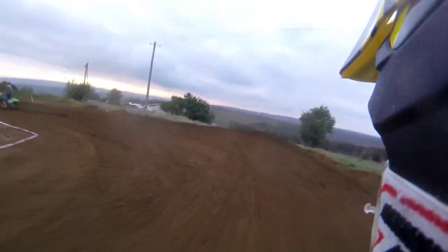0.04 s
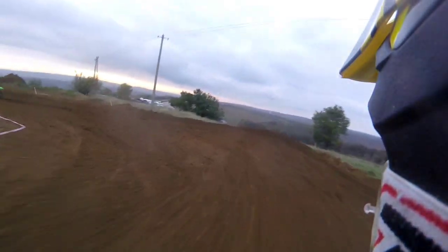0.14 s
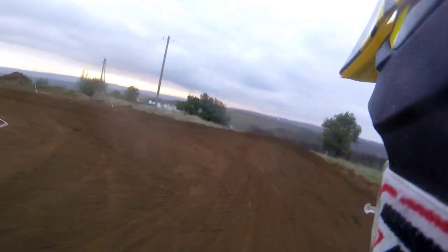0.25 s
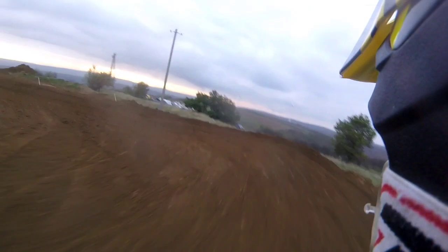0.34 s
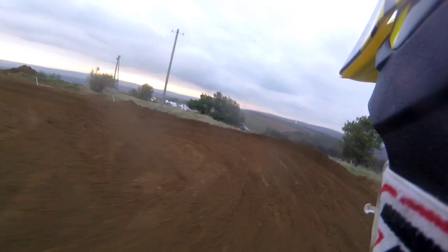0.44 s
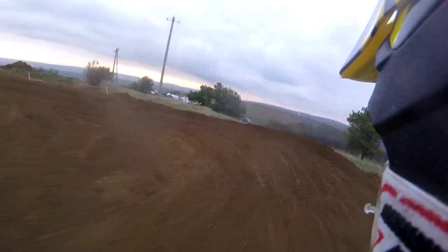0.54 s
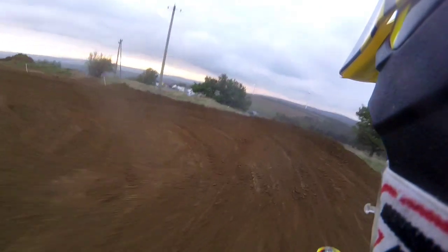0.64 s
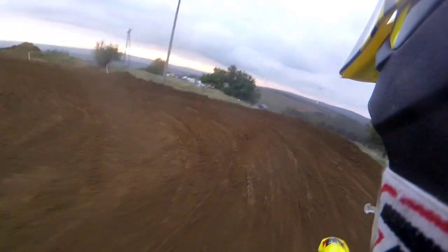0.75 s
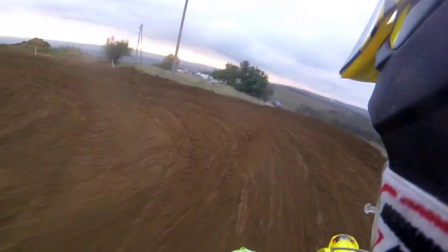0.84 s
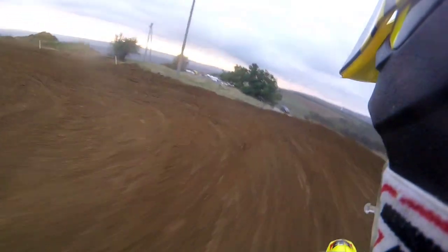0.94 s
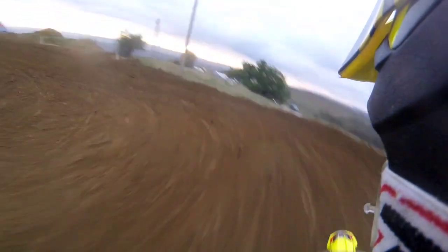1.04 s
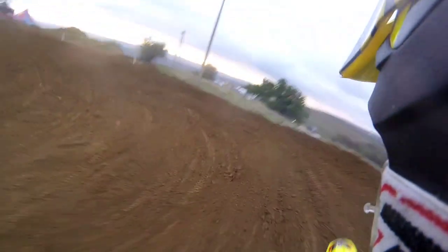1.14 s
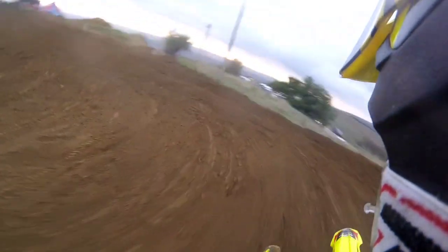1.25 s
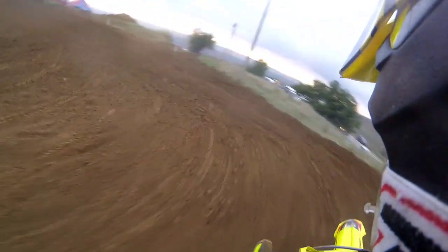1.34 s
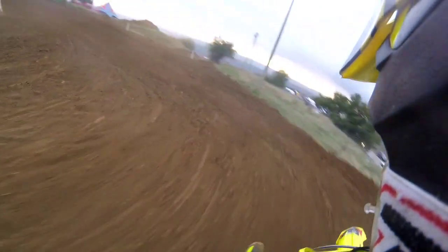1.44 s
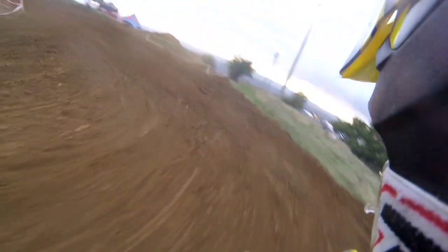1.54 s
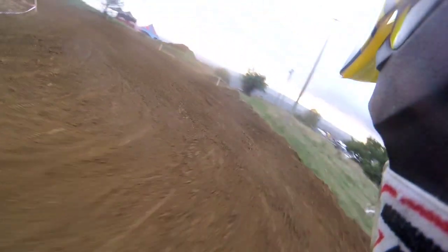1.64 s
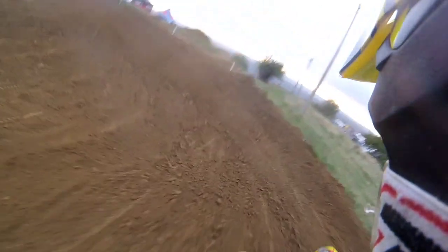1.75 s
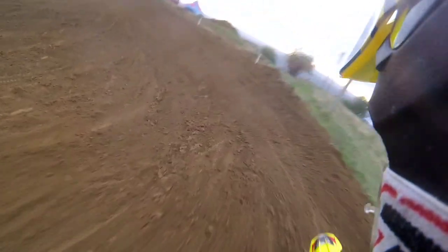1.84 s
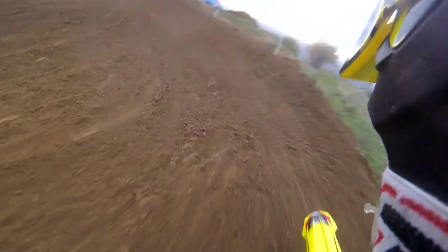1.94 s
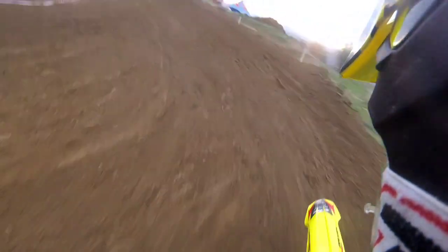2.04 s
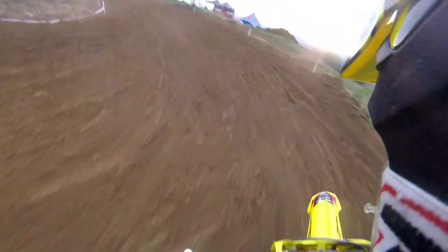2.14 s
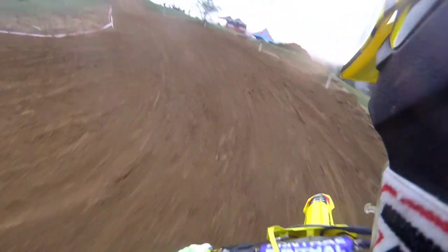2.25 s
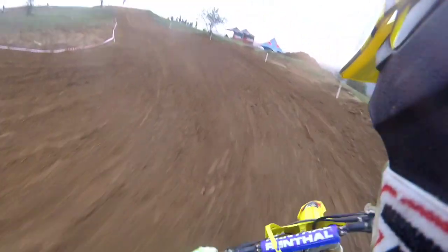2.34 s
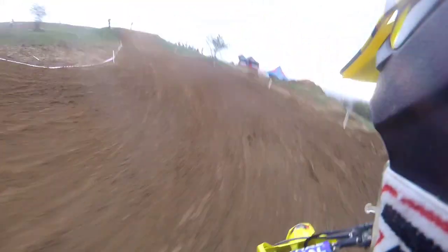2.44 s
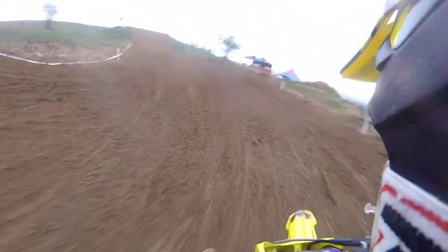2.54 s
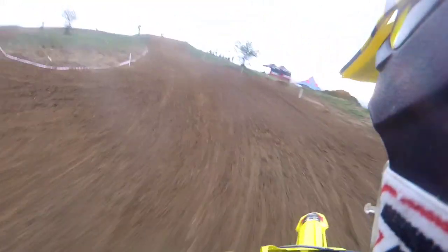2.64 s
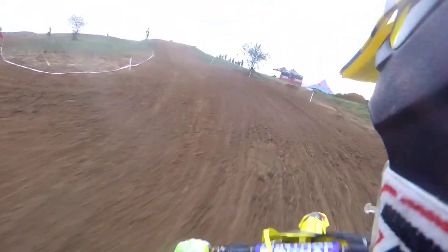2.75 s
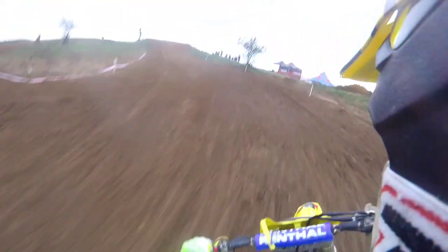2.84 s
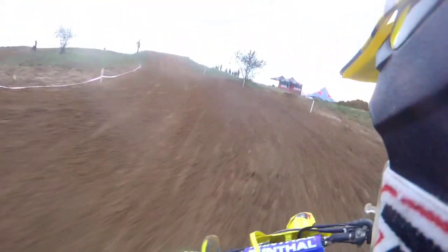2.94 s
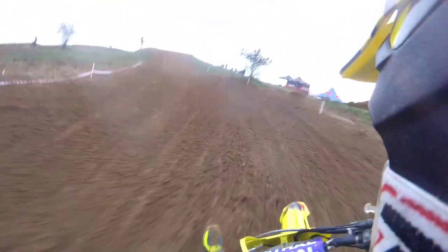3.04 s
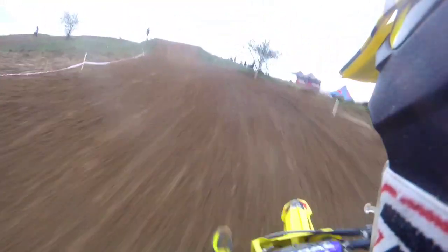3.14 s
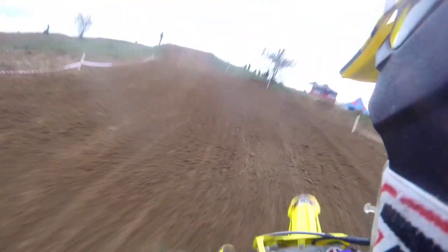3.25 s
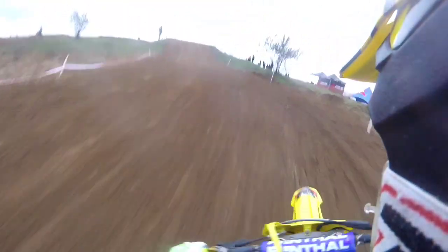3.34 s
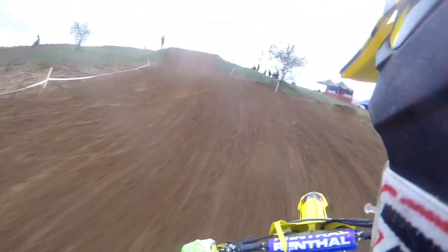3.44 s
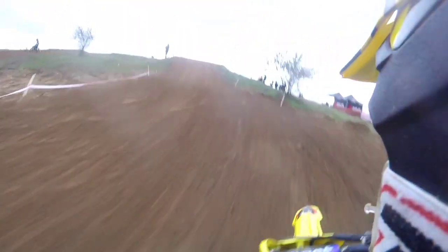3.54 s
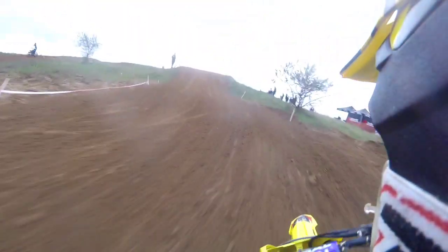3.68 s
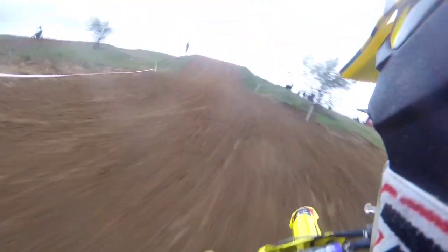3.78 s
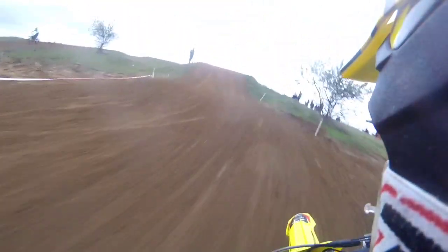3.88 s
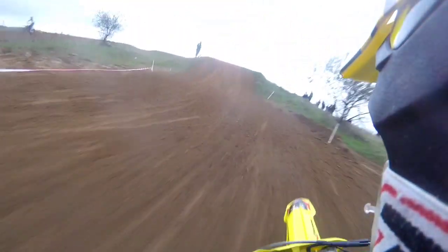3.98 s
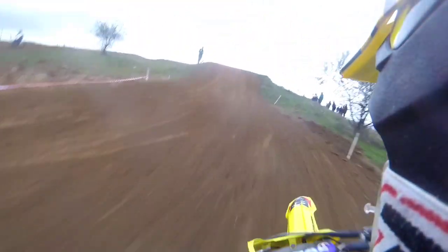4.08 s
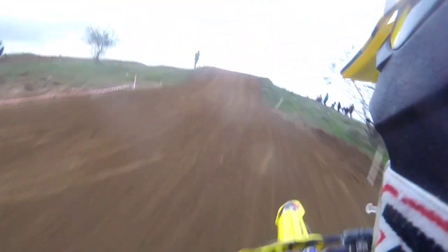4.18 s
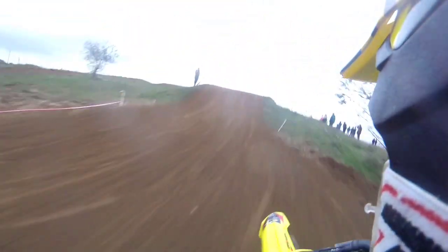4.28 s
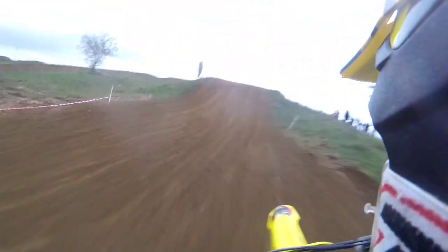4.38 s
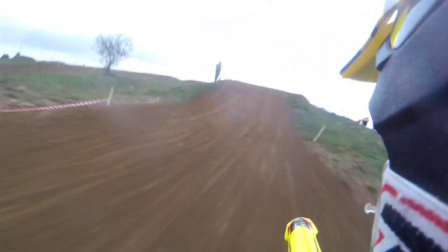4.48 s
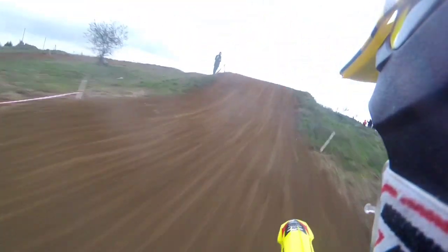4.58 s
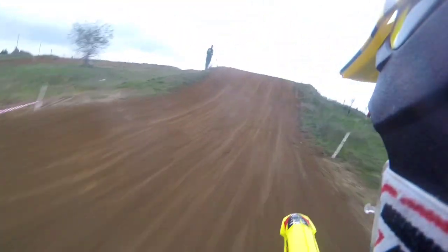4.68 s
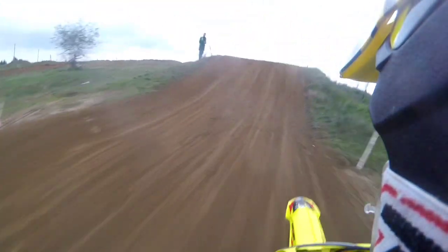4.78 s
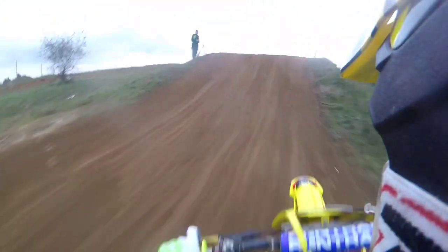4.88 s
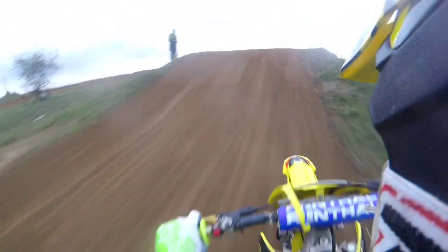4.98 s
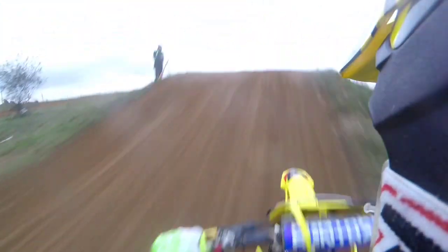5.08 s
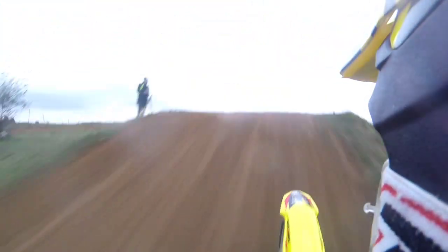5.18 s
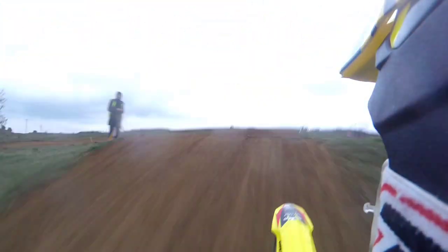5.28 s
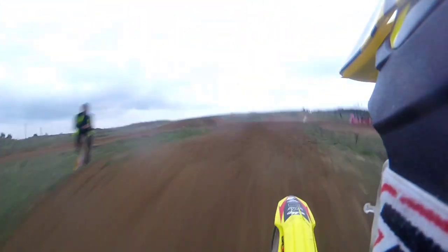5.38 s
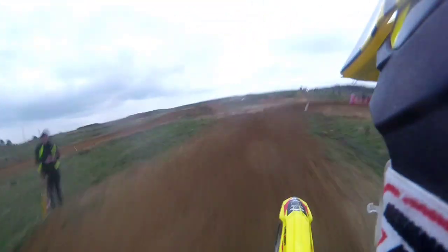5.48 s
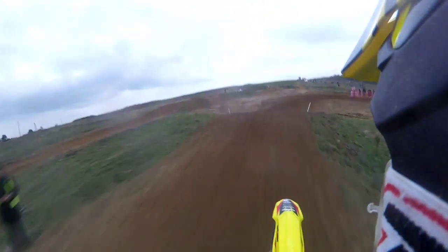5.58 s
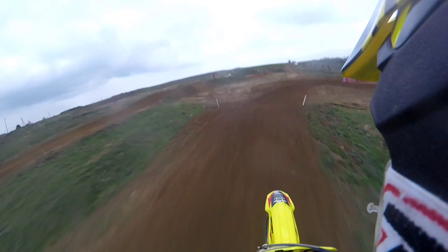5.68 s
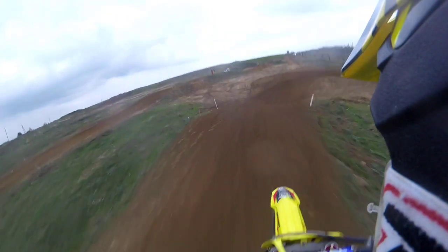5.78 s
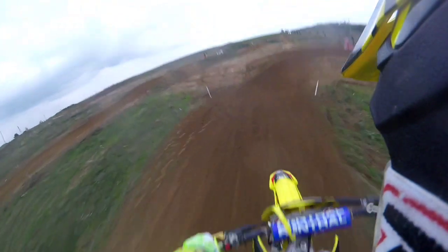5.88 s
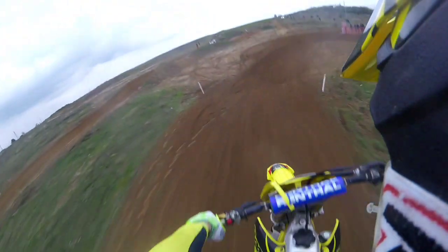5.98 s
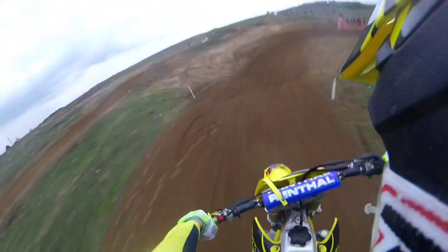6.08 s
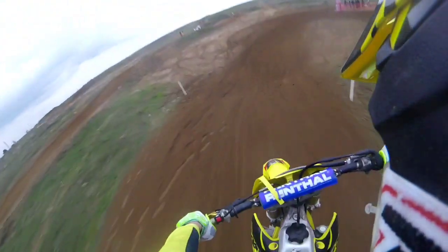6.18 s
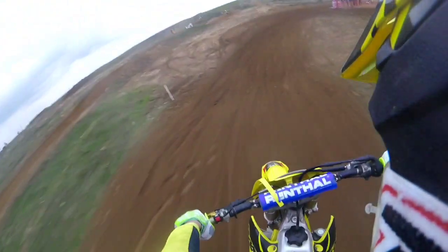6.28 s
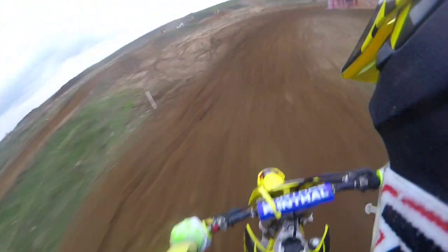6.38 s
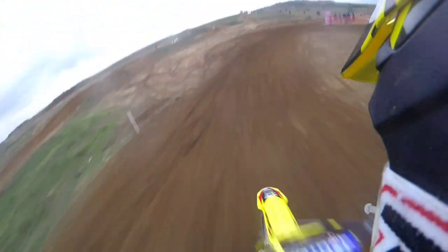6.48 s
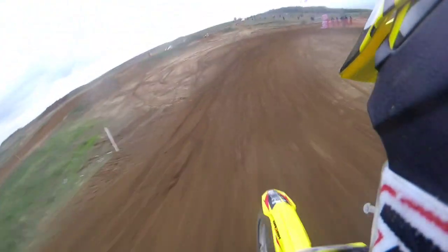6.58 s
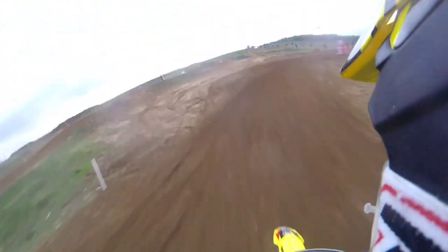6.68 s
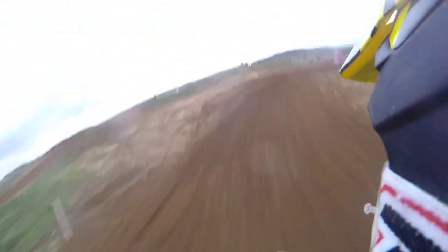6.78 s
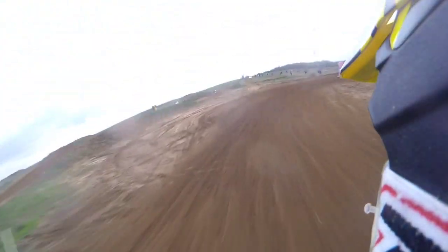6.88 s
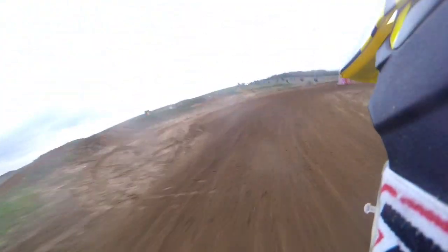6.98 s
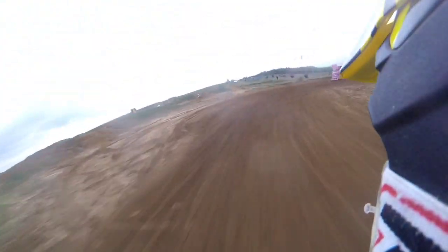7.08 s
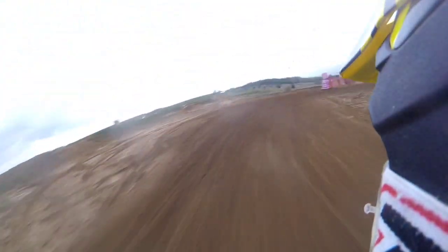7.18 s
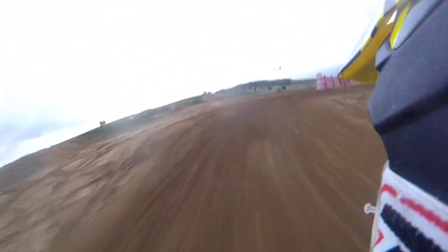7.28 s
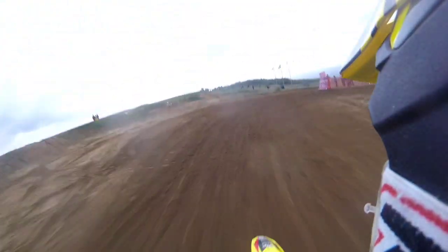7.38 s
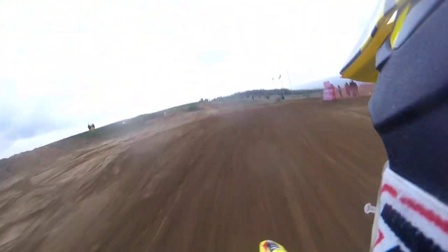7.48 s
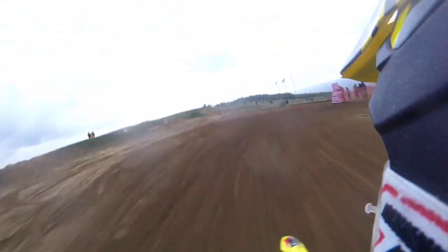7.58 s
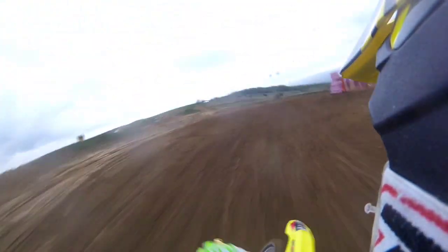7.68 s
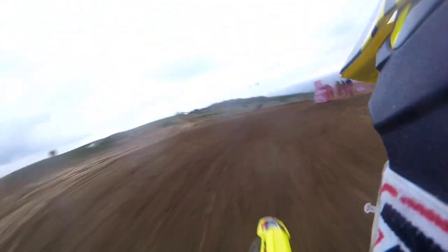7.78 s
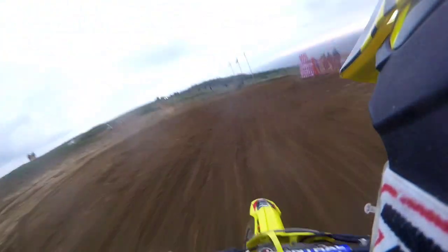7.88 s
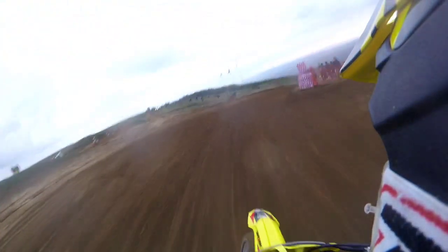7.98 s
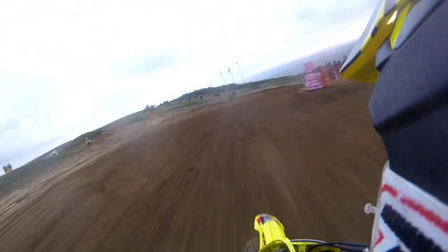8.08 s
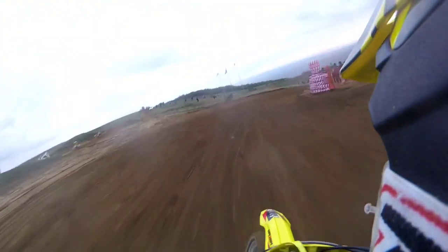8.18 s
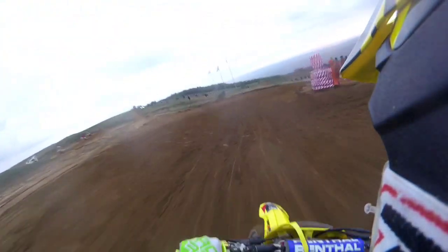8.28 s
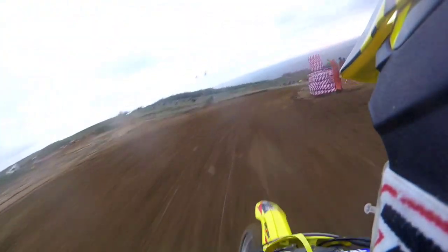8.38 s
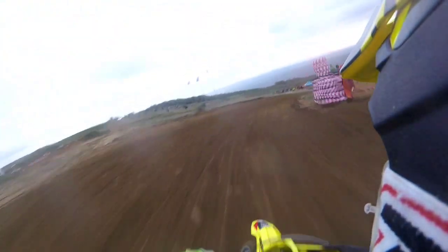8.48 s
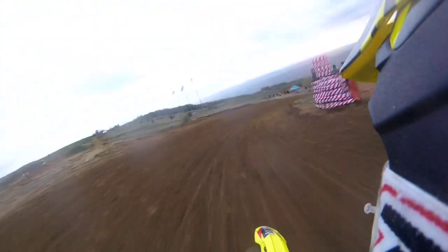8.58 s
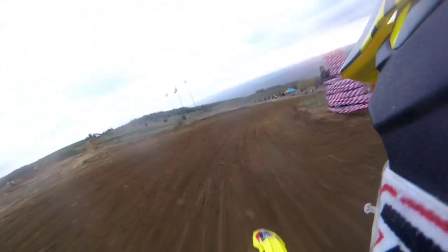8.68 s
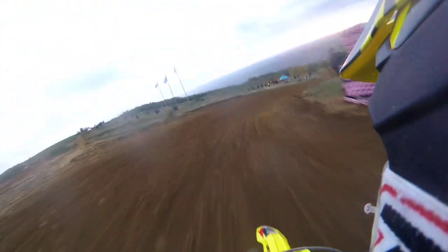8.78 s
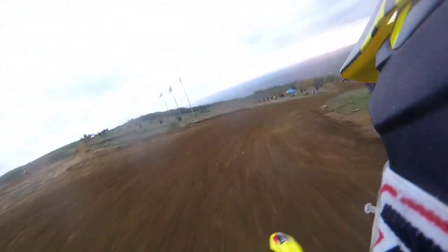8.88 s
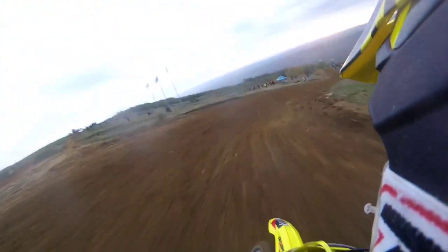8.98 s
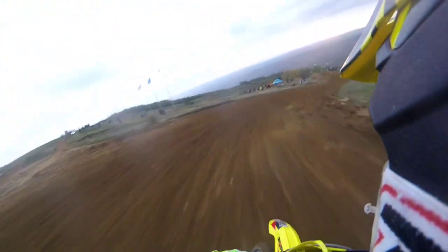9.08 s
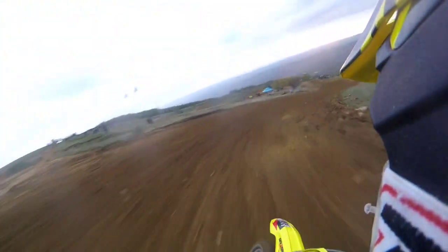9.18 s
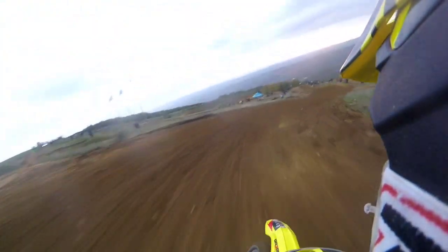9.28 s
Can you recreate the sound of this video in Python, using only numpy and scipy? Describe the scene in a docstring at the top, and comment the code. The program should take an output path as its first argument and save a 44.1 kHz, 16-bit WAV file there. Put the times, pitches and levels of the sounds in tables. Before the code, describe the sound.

A four-stroke dirt bike revs up and down, heard from the rider's helmet, with gusty wind buffeting the microphone.

```python
"""A single-cylinder four-stroke dirt bike, heard from the rider's helmet: throttle blips through a turn,
a pull up a ramp, a jump with one rev in the air, then a fast bumpy descent.
Each firing cracks in the exhaust and booms in the airbox; on a shut throttle the airbox drones.
Wind buffets the microphone, air hisses past, grit ticks on the housing and large eddies slap it."""
import sys
import numpy as np
from scipy import signal
from scipy.fft import rfft, irfft, next_fast_len
from scipy.io import wavfile
from scipy.ndimage import uniform_filter1d, map_coordinates

SR = 44100
rng = np.random.default_rng(int(sys.argv[2]) if len(sys.argv) > 2 else 0)


def to_wav(sig):
    """Store sig (one row per channel, or 1-D mono) as 16-bit WAV at the path in sys.argv[1].

    Samples outside -1..1 are clipped; the rate is SR.
    """
    pcm = np.clip(np.atleast_2d(sig), -1, 1) * 32767
    pcm = np.round(pcm).astype(np.int16)
    wavfile.write(sys.argv[1], SR, pcm.T)  # frames by channels


N = 411453


def from_db(db):
    """Decibels to gain."""
    return 10 ** (np.asarray(db) / 20)


def rms_one(x):
    """Scale to rms 1."""
    return x / np.sqrt(np.mean(x ** 2) + 1e-20)


def evened(x, size=3000):
    """Hold the running rms at 1."""
    power = uniform_filter1d(uniform_filter1d(x * x, size), size)
    return x / np.sqrt(np.abs(power) + 1e-12)


def in_time(rows):
    """Each column of a curve at every sample."""
    s, *columns = np.transpose(rows)
    return [np.interp(np.arange(N) / SR, s, c) for c in columns]


def drift(rate):
    """Smooth chance with spread 1."""
    knots = rng.standard_normal(N // 20)
    return rms_one(map_coordinates(knots, [np.arange(N) / SR * rate], order=1, mode="wrap"))


def coloured(x, spectrum):
    """Causal (minimum-phase) filter with the given spectrum."""
    size = 2 * next_fast_len(N // 2 + 8192)
    hz, db = np.transpose(spectrum)
    grid = np.maximum(np.fft.rfftfreq(8192, 1 / SR), 1)
    below = np.minimum(grid / hz[0], 1)
    cepstrum = irfft(np.log(below * from_db(np.interp(np.log(grid), np.log(hz), db))))
    cepstrum[1:4096] *= 2
    cepstrum[4097:] = 0
    response = irfft(np.exp(rfft(cepstrum)))
    return irfft(rfft(x, size) * rfft(response, size), size)[:N]


def resonance(x, hz, width):
    """Two-pole band-pass with gain 1 on top."""
    r = np.exp(-np.pi * width / SR)
    return signal.lfilter(np.array([1, 0, -1]) * (1 - r * r) / 2,
                          [1, -2 * r * np.cos(2 * np.pi * hz / SR), r * r], x + 1e-18)


def clicks(events):
    """One click per (s, dB) row."""
    s, db = np.transpose(events)
    out = np.zeros(N)
    out[np.clip((s * SR).astype(int), 0, N - 1)] = from_db(db)
    return out


def decay(x, seconds):
    """Each click leaves an exponential tail of its own height."""
    return signal.lfilter([1], [1, -np.exp(-1 / (seconds * SR))], x + 1e-18)


def swell(start, end, attack, release):
    """Rise from 0 to 1 after the start, hold, fall back after the end."""
    t = np.arange(N) / SR
    return np.clip((t - start) / attack, 0, 1) - np.clip((t - end) / release, 0, 1)


def at_hz(spectrum, hz):
    """Read a spectrum in dB at the given frequencies."""
    points, db = np.transpose(spectrum)
    return np.interp(np.log(hz), np.log(points), db)


# Throttle twists, relative levels: (opens [s], shuts [s], exhaust crack [dB], airbox boom [dB],
# thump [dB], crack dullness [dB/octave], pipe ring [dB], coasting drone [dB], second puff [0-1])
THROTTLE_PULLS = [(0.0, 0.113, -23, -25.5, -36, -6, -1.5, -16.5, 0.72),
                  (0.992, 1.1, -32, -31, -38, 3, 1, -25, 0.53),
                  (1.558, 1.694, -36.5, -27, -26, -5, 7, -17, 0.56),
                  (1.69, 1.887, -31.5, -48, -21.5, -3, 5.5, -17, 0),
                  (2.038, 2.19, -29.5, -30.5, -22, 0.5, -5.5, -29, 0.83),
                  (2.177, 2.367, -32, -49, -22, 5, -2, -30, 0.87),
                  (2.37, 2.795, -32.5, -28, -25, -3, -1, -26, 0.94),
                  (2.804, 3.244, -32.5, -28.5, -24.5, -1.5, -1, -24, 0.84),
                  (3.258, 3.536, -39, -35.5, -26, 2, -1.5, -26, 0.8),
                  (3.513, 3.8, -35, -30.5, -27.5, -2, 1, -29, 0.85),
                  (3.799, 4.283, -33, -22.5, -26.5, -3.5, -2.5, -24, 0.42),
                  (4.273, 4.564, -35, -18, -33, -5, 2, -24, .15),
                  (4.555, 4.77, -35.5, -15, -31, -4, 4, -29, 0.2),
                  (4.775, 4.975, -44, -19.5, -42, 2, 0, -27, 0),
                  (4.982, 5.23, -39, -20.5, -40, 0.5, 7, -25, 0),
                  (5.23, 5.503, -43, -31.5, -46, 1, -1, -24, 0.58),
                  (6.26, 6.617, -40.5, -39.5, -27.5, 0, 11, -27.5, 0.1),
                  (6.76, 6.854, -41.5, -39.5, -36, -7, 3, -23, 0.57),
                  (7.968, 9.4, -42, -42, -36, 4, -3, -31, 0.5)]


def throttle_controls(open_s=0.054, shut_s=0.056):
    """Throttle opening 0-1, then each pull's tone settings, held until the next pull opens."""
    opening = sum(swell(opens, shuts, open_s, shut_s) for opens, shuts, *_ in THROTTLE_PULLS)
    settings = []
    for previous, pull in zip(THROTTLE_PULLS[:1] + THROTTLE_PULLS, THROTTLE_PULLS):
        settings += [(pull[0], *previous[2:]), (pull[0] + open_s, *pull[2:])]
    return [np.clip(opening, 0, 1)] + in_time(settings)


# Exhaust crack: (frequency [Hz], gain [dB])
CRACK_SPECTRUM = [(60, -2.5), (200, -9), (300, -0.5), (385, -9), (470, 2.5), (560, -3.5), (680, -5),
                  (900, -10), (1100, -12), (1420, -12), (1700, -15.5), (2100, -21), (2600, -27),
                  (3200, -36), (4300, -45.5)]
# Airbox boom: (frequency [Hz], gain [dB])
BOOM_SPECTRUM = [(60, -28), (125, -15.5), (190, -3), (280, 1), (335, -3.5), (390, -25), (600, -59)]
# Pipe resonances: (centre [Hz], half-width [Hz], share of ring [0-1])
PIPE_MODES = [(472, 41, 0.68), (784, 68, 1.0), (960, 28, .5), (1244, 28, .5), (2740, 140, 0.82)]


def exhaust(cycle, controls, puff_lag_cycles=.175, puff_delay_s=.0009, puff_cutoff_hz=1400, echo=0.57):
    """Firing harmonics: a pressure spike on the airbox boom's crest, notched by a puff and its echo."""
    rate_hz, crack_db, boom_gain, dull_db_per_oct, ring_db, puff_gain = (c[::4] for c in controls)
    spike_step = np.exp(2j * np.pi * cycle[::4])
    lag_step = np.exp(-2j * np.pi * (puff_lag_cycles + puff_delay_s * rate_hz))
    pressure, spike, lag = 0, 1, 1
    for harmonic in range(1, 52):
        hz = harmonic * rate_hz
        spike, lag = spike * spike_step, lag * lag_step
        ring = sum(share / (1 + ((hz - centre) / width) ** 2) for centre, width, share in PIPE_MODES)
        treble_loss_db = dull_db_per_oct * np.log2(np.maximum(hz / 700, 1))
        crack = from_db(crack_db + at_hz(CRACK_SPECTRUM, hz) + ring_db * ring - treble_loss_db)
        boom = boom_gain * from_db(at_hz(BOOM_SPECTRUM, hz))
        puff = lag * np.clip(puff_gain, 0, 1) / (1 + (hz / puff_cutoff_hz) ** 2)
        pressure = pressure + (crack + boom) * (spike * (1 + puff + echo * puff * puff)).real
    return np.sqrt(2) * signal.resample_poly(pressure, 4, 1)[:N]


# Engine speed: (time [s], firing rate [Hz])
FIRING_RATE = [(0.0, 37.5), (0.04, 39.2), (0.15, 67), (0.3, 58), (0.508, 41.1), (0.866, 26.1),
               (1.016, 38.4), (1.126, 56), (1.55, 31.8), (1.6, 37.2), (1.67, 51.6), (1.76, 67),
               (1.85, 75.3), (1.89, 77.5), (1.96, 67.7), (2.06, 59.2), (2.14, 68), (2.2, 68.6),
               (2.25, 65.6), (2.33, 56.3), (2.42, 48), (2.48, 47.5), (2.55, 49.4), (2.68, 60.5),
               (2.74, 64.6), (2.78, 61.4), (2.86, 50), (2.92, 47), (2.98, 50.4), (3.15, 65.7), (3.23, 70.2),
               (3.28, 66.7), (3.34, 56.4), (3.5, 49.3), (3.72, 61.7), (3.84, 60.7), (3.9, 64.4), (3.98, 65),
               (4.05, 70.5), (4.15, 71.1), (4.265, 70.4), (4.31, 80.5), (4.35, 87), (4.49, 83.4), (4.6, 90),
               (4.72, 93.9), (4.78, 89), (4.86, 80.5), (4.93, 86), (5.0, 71.5), (5.04, 79), (5.12, 73.5),
               (5.4, 71.5), (5.5, 74), (5.65, 52), (5.956, 33), (6.12, 56), (6.17, 57), (6.22, 64),
               (6.35, 74.6), (6.45, 81), (6.53, 83.3), (6.62, 84.5), (6.784, 67.6), (7.216, 71.2),
               (7.474, 61.6), (7.65, 68.1), (7.834, 60.8), (8.02, 63.5), (8.15, 69.5), (8.508, 64.2),
               (9.33, 71.6)]
# Gas rush: (frequency [Hz], relative density [dB])
RASP_SPECTRUM = [(800, 12.5), (1500, 10), (2600, -1), (4300, -9), (5500, -6.5), (6500, 0.5), (7500, -6),
                 (10000, -36)]


def engine(coast_ref_hz=67, lug_below_hz=66.6, shut_crack_db=-18, shut_thump_db=-11):
    """Exhaust crack, airbox boom, thump, drone and gas rasp, all locked to the firing cycle."""
    rate_hz = uniform_filter1d(in_time(FIRING_RATE)[0], size=1000)   # flywheel inertia
    cycle = np.cumsum(rate_hz * (1 + .0015 * drift(40))) / SR + .1
    throttle, crack_db, boom_db, thump_db, dull_db_per_oct, ring_db, drone_db, puff = throttle_controls()
    shut = 1 - throttle
    coast_db = 5.5 * np.log2(rate_hz / coast_ref_hz)   # coasting levels sink with the revs
    crack_db = crack_db + shut * (shut_crack_db + coast_db)
    dull_db_per_oct += np.clip(16.5 * np.log2(lug_below_hz / rate_hz), 0, 13)   # duller at low revs
    uneven_db = .7 * drift(70)
    boom_gain = throttle * from_db(boom_db)
    bark = exhaust(cycle, (rate_hz, crack_db + uneven_db, boom_gain, dull_db_per_oct, ring_db, puff))
    thump = -np.sin(2 * np.pi * cycle) - 0.74 * np.sin(4 * np.pi * cycle)
    thump_gain = from_db(thump_db + shut * shut_thump_db + 2.5)
    drone_gain = shut * from_db(drone_db + coast_db)
    gas_flow = 0.3 + np.exp(-(cycle % 1) / 0.22)   # peaks as the valve opens
    rasp = rms_one(coloured(gas_flow * rng.standard_normal(N), RASP_SPECTRUM))
    rasp_gain = from_db(crack_db - 5.5) + from_db(-21.5) * drone_gain
    return bark + thump_gain * thump + drone_gain * overrun_drone(cycle) + rasp_gain * rasp


def overrun_drone(cycle, uneven_db=1.5):
    """Shut throttle: uneven firings drone in the airbox, led by the fourth harmonic."""
    firings = np.diff(np.floor(cycle), prepend=0) * from_db(uneven_db * rng.standard_normal(N))
    ring = resonance(firings, hz=170, width=30)
    drone = evened(resonance(ring, hz=169, width=250))
    fourth = resonance(np.sin(8 * np.pi * cycle), hz=179.6, width=30)
    waver = from_db(1.3 * drift(40))
    return rms_one(0.76 * drone + 2 * 0.74 * waver * fourth)


# Steady wind, relative levels: (time [s], rumble [dB], turbulence [dB])
STEADY_WIND = [(0, -19.5, -28), (.7, -24, -39.5), (1.0, -20, -33), (1.6, -24, -35), (1.88, -22.5, -29.5),
               (2.1, -28.5, -41), (2.33, -20.5, -36.5), (2.6, -21, -31.5), (3.0, -20, -31.5),
               (3.5, -18.5, -31), (3.75, -19.5, -29.5), (4.0, -20, -22.5), (4.14, -23.5, -28.5),
               (4.27, -19.5, -24.5), (4.7, -22, -23), (5.1, -19.5, -27), (5.5, -17, -31), (5.7, -19.5, -33),
               (6.1, -25.5, -40.5), (6.55, -23, -36.5), (6.74, -25, -34.5), (6.81, -19, -24.5),
               (7.7, -17, -24.5), (8.3, -24, -25.5), (8.65, -19.5, -23.5), (8.9, -24, -30),
               (9.33, -23, -31)]
# Gusts: (start [s], end [s], rise [s], rumble gain [dB], turbulence gain [dB])
WIND_GUSTS = [(2.358, 2.42, .025, 6.5, -1), (2.48, 2.58, .025, 3.5, 2), (3.088, 3.207, 0.033, 0.5, 5.5),
              (5.188, 5.375, 0.11, 2, 8), (6.193, 6.294, 0.034, 4.5, 3.5), (6.764, 6.887, 0.022, 5, 2),
              (7.754, 7.952, 0.19, 5.5, 1.5), (7.906, 7.947, .02, 1.5, 5), (8.288, 8.374, .025, 5.5, 2.5),
              (8.577, 8.586, .012, 4, 2.5), (8.96, 9.054, .015, 4.5, 5.5), (9.202, 9.4, 0.077, 8, 8)]
# Microphone out of the airflow:
# (start [s], end [s], onset [s], recovery [s], rumble loss [dB], turbulence loss [dB])
WIND_LULLS = [(1.274, 1.565, 0.15, 0.14, 4, 8.5), (5.388, 5.424, .015, .02, 10.5, 1.5),
              (6.31, 6.551, 0.047, 0.076, 9.5, 7.5), (7.954, 8.05, 0.034, 0.22, 9, 11)]


def wind_levels_db(gust_release_s=0.022):
    """Rumble and turbulence levels: steady wind, raised by gusts, cut by lulls."""
    gusts = sum(np.outer(db, swell(start, end, rise, gust_release_s))
                for start, end, rise, *db in WIND_GUSTS)
    lulls = sum(np.outer(db, swell(start, end, onset, recovery))
                for start, end, onset, recovery, *db in WIND_LULLS)
    return np.array(in_time(STEADY_WIND)) + gusts - lulls + drift(11)


# Deep rumble of calm air: (frequency [Hz], relative density [dB])
BUFFET_SPECTRUM = [(15, -17), (30, -7), (60, 0), (110, -1), (170, -7), (260, -18), (380, -30), (600, -44),
                   (1500, -66)]
# Roar of turbulent air: (frequency [Hz], relative density [dB])
ROAR_SPECTRUM = [(15, -3.5), (30, -9), (60, -0.5), (130, -1), (220, -1), (320, -4.5), (450, -9),
                 (700, -16.5), (1500, -75)]
# Pressure spike of one eddy: (frequency [Hz], relative density [dB])
EDDY_SPECTRUM = [(40, 1), (130, -3.5), (240, 0.5), (500, -3), (1000, -10.5), (2200, -25.5), (3200, -33),
                 (4300, -38.5), (10000, -84.5)]
# Fine turbulence: (frequency [Hz], relative density [dB])
FLUTTER_SPECTRUM = [(150, -17.5), (400, 2.5), (800, 0), (1500, -8), (2500, -16.5), (3300, -23.5),
                    (4400, -34), (5500, -26), (10000, -103.5)]


def wind(eddies_per_s=420):
    """Lumpy rumble; small eddies burst on the microphone port as clumps of one-sided pressure spikes."""
    rumble_db, turbulence_db = wind_levels_db()
    roar_share = np.clip((turbulence_db - rumble_db + 17) / 6, 0, 1)
    buffet = rms_one(coloured(rng.standard_normal(N), BUFFET_SPECTRUM))
    roar = rms_one(coloured(rng.standard_normal(N), ROAR_SPECTRUM))
    rumble = np.sqrt(1 - roar_share) * buffet + np.sqrt(roar_share) * roar
    eddy_sizes = from_db(3.5 * np.minimum(rng.exponential(1, N), 3.5))
    eddies = (rng.random(N) < eddies_per_s / SR) * eddy_sizes
    clumps = from_db(2.2 * drift(45))
    spikes = rms_one(clumps * coloured(eddies - eddies.mean(), EDDY_SPECTRUM))
    flare = from_db(3.4 * np.clip(rumble, -2, 2) + drift(35))   # flutter rides the pressure crests
    flutter = rms_one(coloured(clumps * flare * rng.standard_normal(N), FLUTTER_SPECTRUM))
    turbulence = from_db(-1) * spikes + from_db(-3) * flutter
    return from_db(rumble_db + 2.18) * rumble + from_db(turbulence_db) * turbulence


# Airflow round the helmet: (time [s], relative level [dB])
HISS_LEVEL = [(0, -56), (.6, -69), (1.05, -48.5), (1.55, -51), (1.85, -37.5), (2.45, -41), (2.8, -38),
              (3.45, -44), (3.95, -39.5), (4.8, -41.5), (5.3, -46.5), (5.5, -53), (6.0, -56), (6.5, -38),
              (6.85, -46), (7.4, -45), (8.15, -42.5), (8.8, -50.5), (9.33, -44)]
# Hiss with a narrow housing resonance: (frequency [Hz], relative density [dB])
HISS_SPECTRUM = [(2500, 2.5), (4400, -17), (5500, -4), (6200, -7), (6470, 6.5), (6720, 3), (7000, 2.5),
                 (8000, 3.5), (9200, 4.5), (10200, -5), (11000, -25.5)]


def air_hiss(throttle_boost_db=3.5):
    """Bright, flickering rush of air past the helmet, louder under power."""
    throttle = throttle_controls()[0]
    level_db = in_time(HISS_LEVEL)[0] + throttle_boost_db * throttle - 0.8
    flicker_db = 1.04 * drift(90)
    return from_db(level_db + flicker_db) * rms_one(coloured(rng.standard_normal(N), HISS_SPECTRUM))


# Grit impacts: (time [s], relative level [dB])
GRIT_HITS = [(0.641, -36), (0.6887, -24), (0.7314, -31), (1.0405, -23), (1.2284, -13), (6.1396, -12),
             (6.6737, -11.5), (8.9935, -19)]
# Tick on the housing: (frequency [Hz], relative density [dB])
TICK_SPECTRUM = [(1500, -2), (4400, -17.5), (5900, -8), (6600, -1), (9000, -0.5), (11000, -33)]


def grit():
    """Specks of dirt strike the housing, each a short noise burst."""
    bursts = decay(clicks(GRIT_HITS), seconds=0.0055) * rng.standard_normal(N)
    return from_db(-8) * coloured(bursts, TICK_SPECTRUM)


# Large eddies: (time [s], relative level [dB], crest time constant [s])
WIND_SLAPS = [(3.001, -8, .0005), (3.55, -7, .0005), (4.959, -9, .0004), (5.093, -6, .0007),
              (5.179, -7.5, .0004), (5.2445, -6, .0007), (5.268, -5, .001), (5.284, -5, .0005),
              (5.301, -6, .0005), (5.3135, -5, .0005), (5.374, -3, .0008), (5.7503, -3, .0005),
              (5.8155, -7.5, .0005), (5.9195, -2.5, .0005), (6.009, -8, .001), (6.257, -4, .002),
              (6.678, -8, .0003), (6.776, -8, .0008), (6.807, -4, .0005), (6.8865, -3, .0007),
              (7.0125, -3, .0007), (7.082, -5, .0004), (7.122, -5, .0004), (7.654, -6, .0008),
              (7.679, -4.5, .0004), (7.718, -6, .001), (7.934, -6, .0006), (7.946, -6, .0006),
              (8.294, -6, .0004), (8.59, -6, .0004), (9.0005, -7, .001), (9.22, -8, .0005),
              (9.262, -5, .0004)]


def wind_slaps(churn_decay_s=0.0033, lowpass_hz=2600):
    """Single large eddies: a pointed pressure crest, a shallow trough behind it, a short churn."""
    pressure = np.zeros(N)
    t = np.arange(-1000, 2000) / SR
    for time_s, level_db, width_s in WIND_SLAPS:
        crest = np.exp(-np.abs(t / width_s))
        trough = -.2 * np.exp(-np.abs(t / width_s - 3) / 4)
        churn = 0.037 * (t > 0) * np.exp(-np.abs(t) / churn_decay_s) * rng.standard_normal(len(t))
        start = int((time_s + t[0]) * SR)
        pressure[start:start + len(t)] += from_db(level_db + 2) * (crest + trough + churn)[:N - start]
    return signal.sosfilt(signal.butter(4, lowpass_hz, fs=SR, output="sos"), pressure)


def scene():
    """Mono mix in open air; all sources travel with the microphone."""
    return (engine() + wind() + wind_slaps() + air_hiss() + grit())[None]


def record(dry, ceiling=.88, cutoff_hz=10900):
    """Soft clip, then steep low-pass."""
    rounded = dry / (1 + (dry / ceiling) ** 6) ** (1 / 6)
    return signal.sosfilt(signal.ellip(10, .3, 80, cutoff_hz, fs=SR, output="sos"), rounded)


dry = scene()
out = record(dry)
to_wav(out)
```